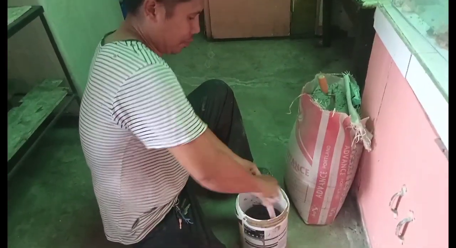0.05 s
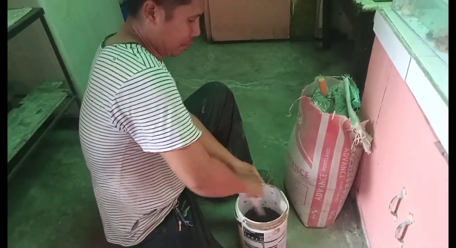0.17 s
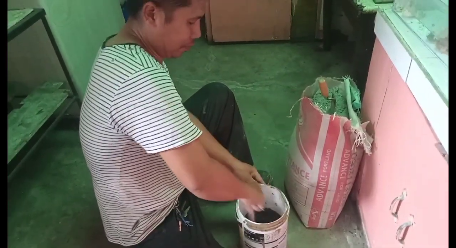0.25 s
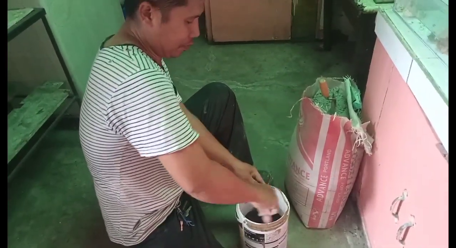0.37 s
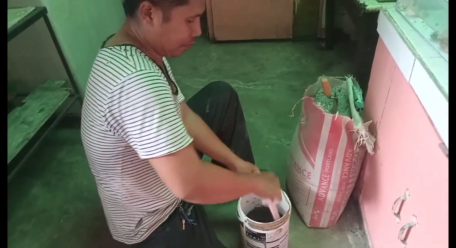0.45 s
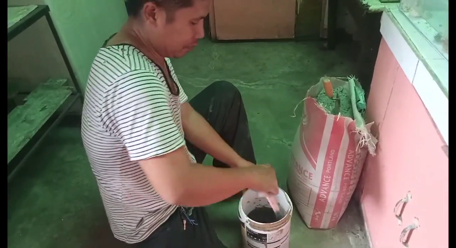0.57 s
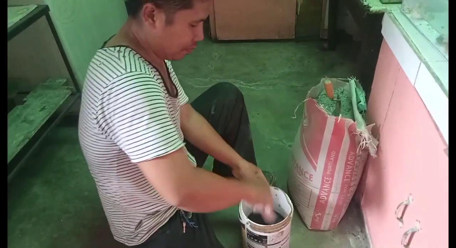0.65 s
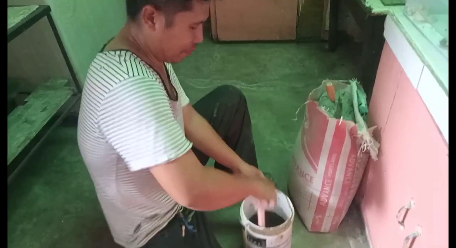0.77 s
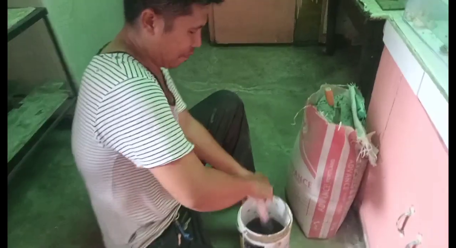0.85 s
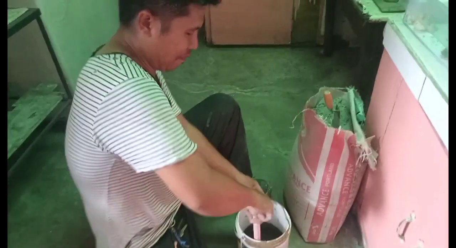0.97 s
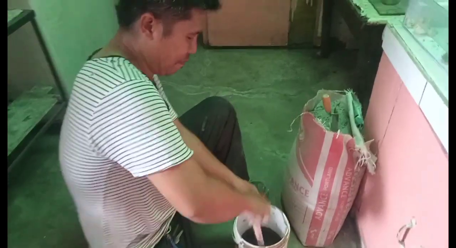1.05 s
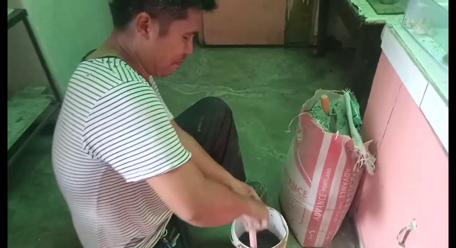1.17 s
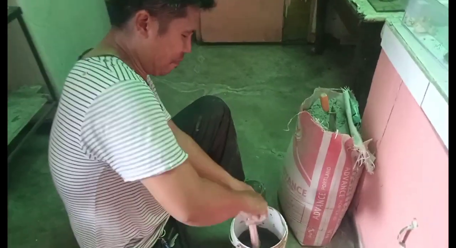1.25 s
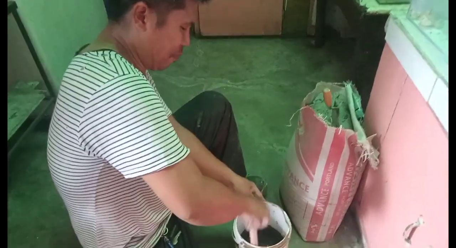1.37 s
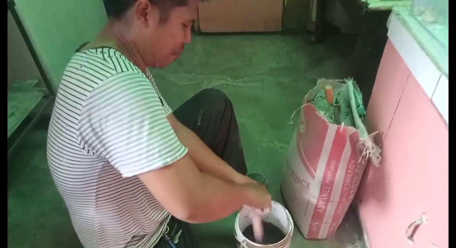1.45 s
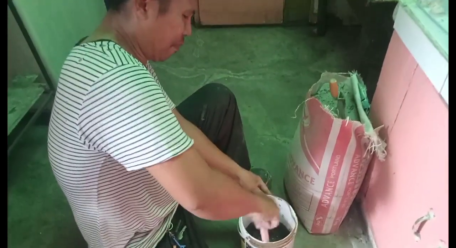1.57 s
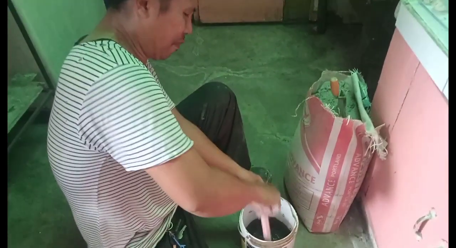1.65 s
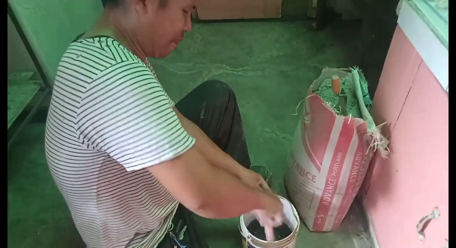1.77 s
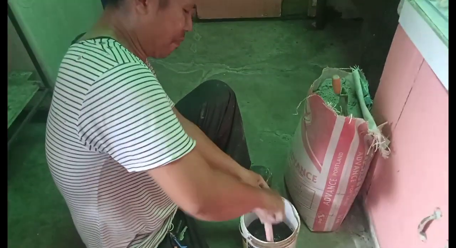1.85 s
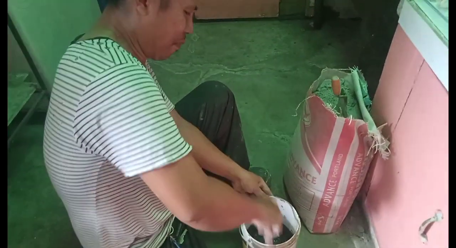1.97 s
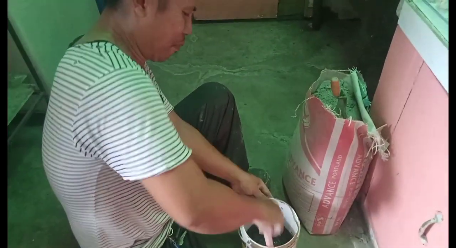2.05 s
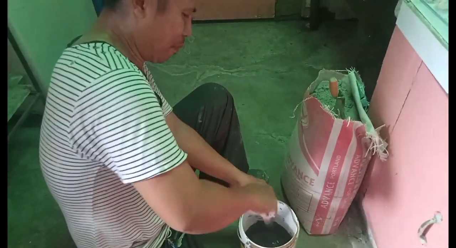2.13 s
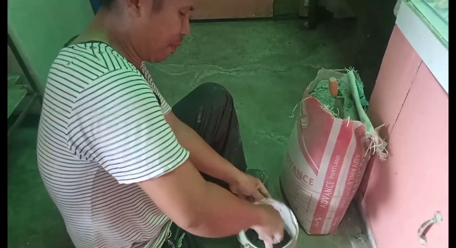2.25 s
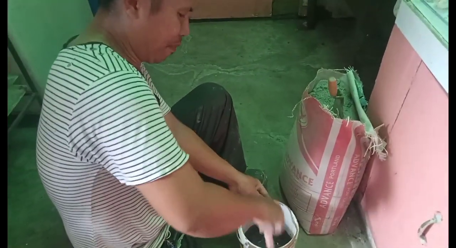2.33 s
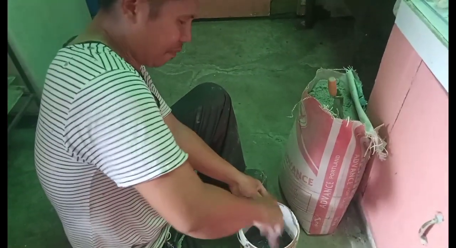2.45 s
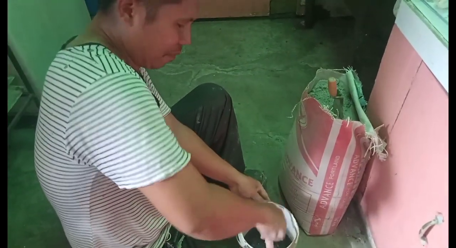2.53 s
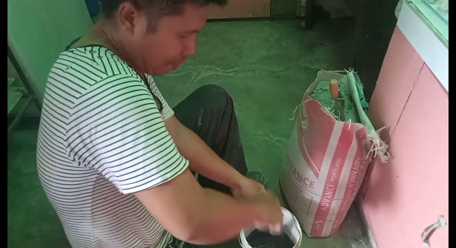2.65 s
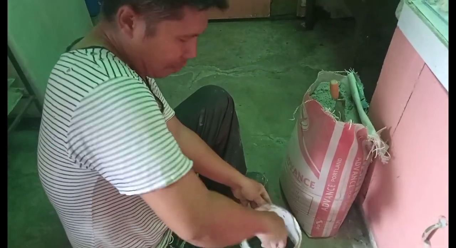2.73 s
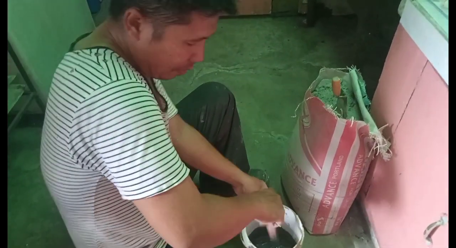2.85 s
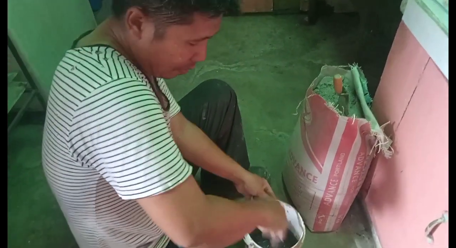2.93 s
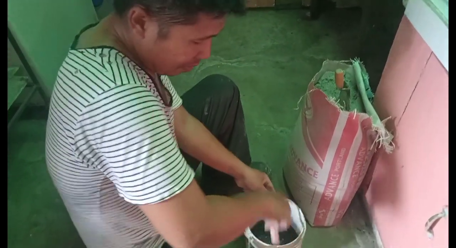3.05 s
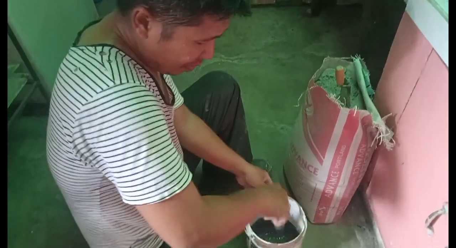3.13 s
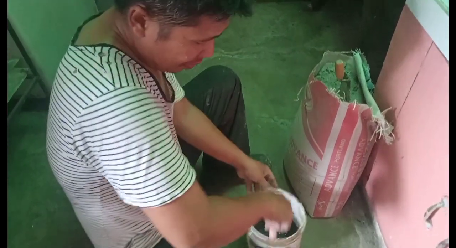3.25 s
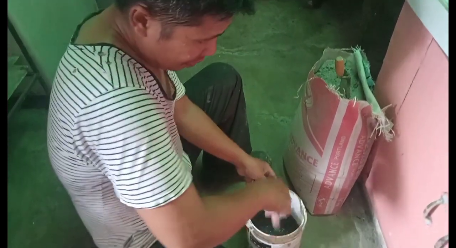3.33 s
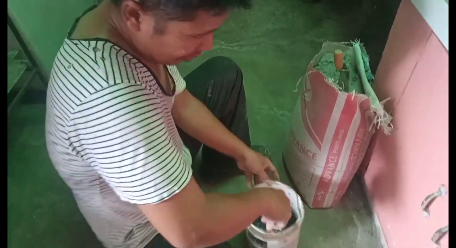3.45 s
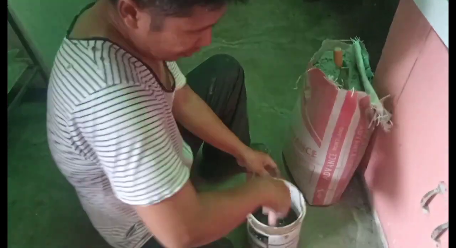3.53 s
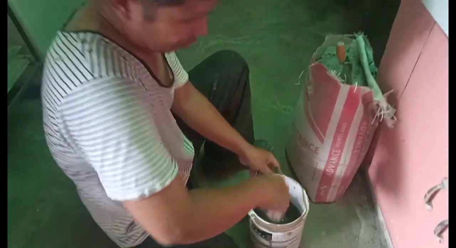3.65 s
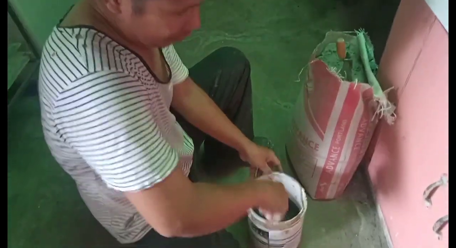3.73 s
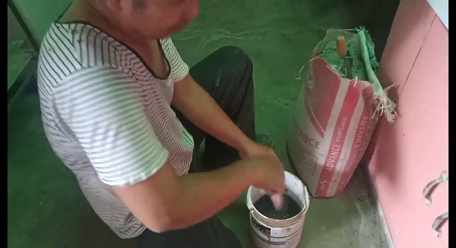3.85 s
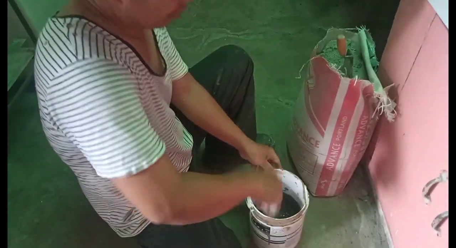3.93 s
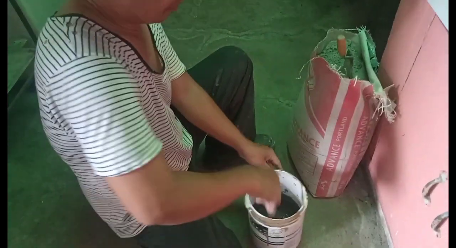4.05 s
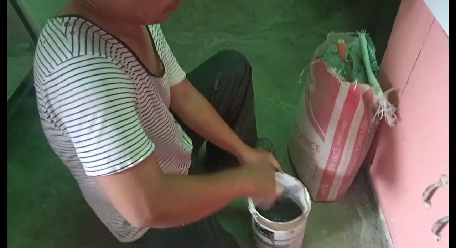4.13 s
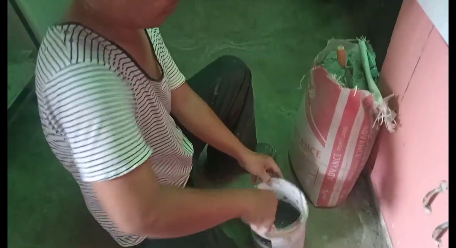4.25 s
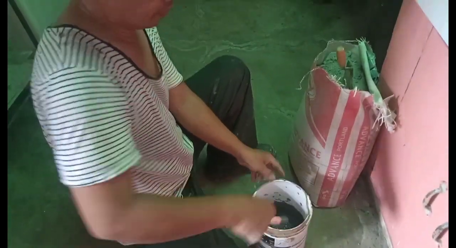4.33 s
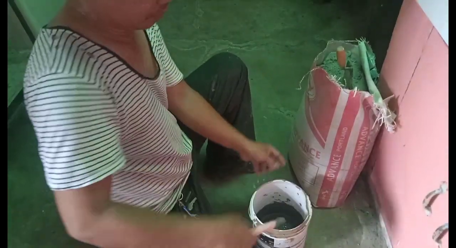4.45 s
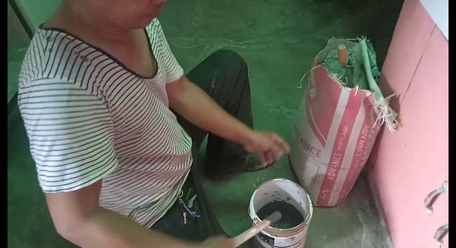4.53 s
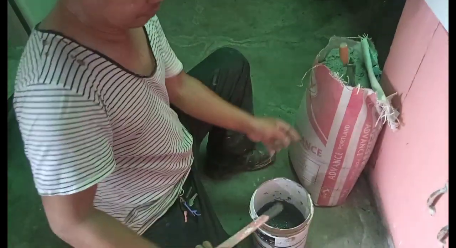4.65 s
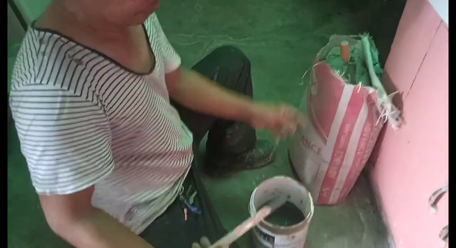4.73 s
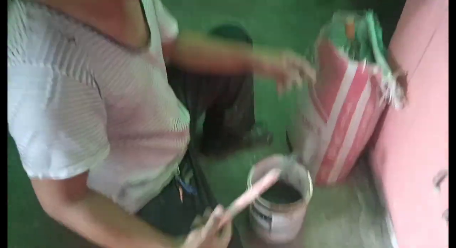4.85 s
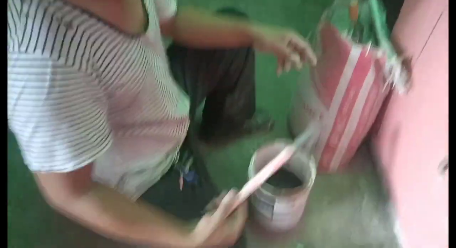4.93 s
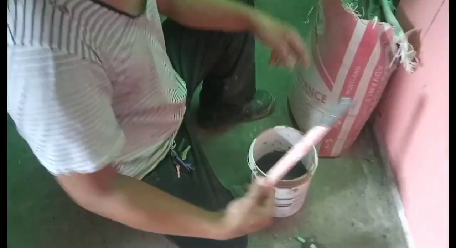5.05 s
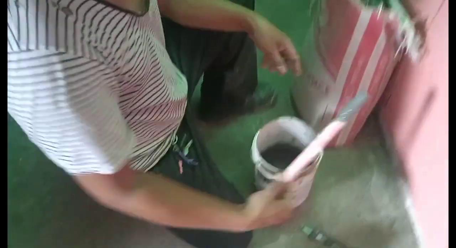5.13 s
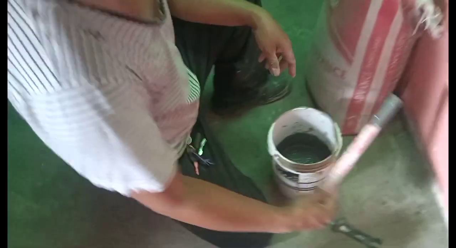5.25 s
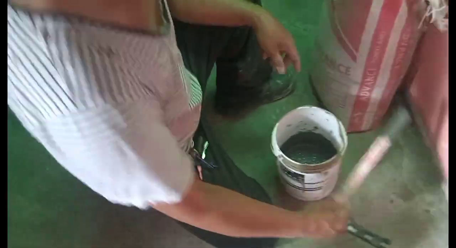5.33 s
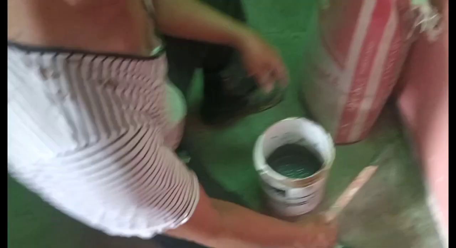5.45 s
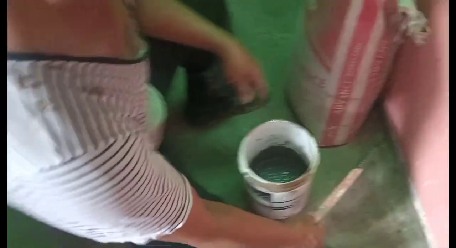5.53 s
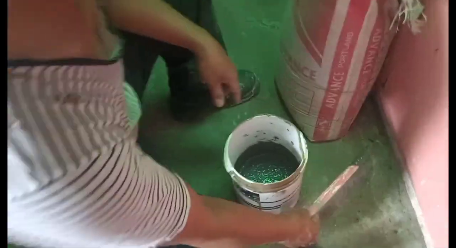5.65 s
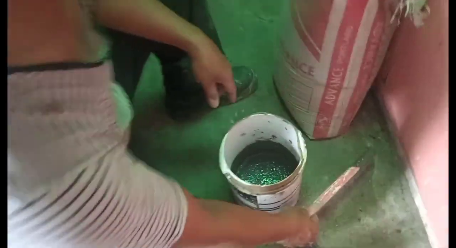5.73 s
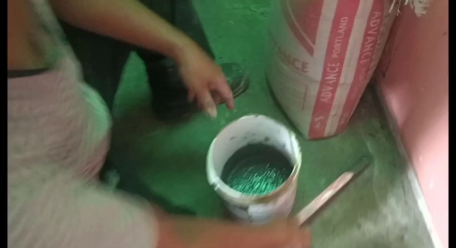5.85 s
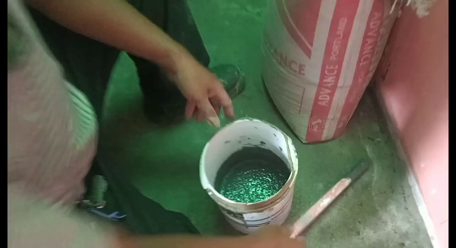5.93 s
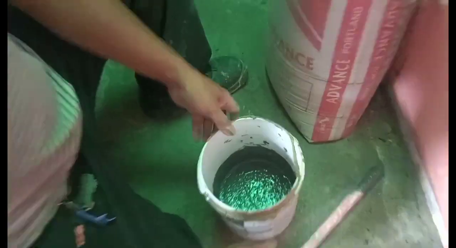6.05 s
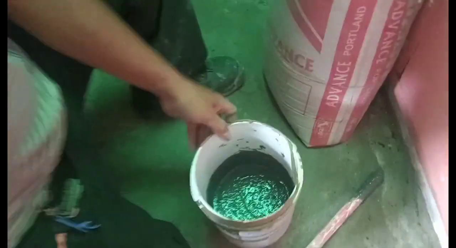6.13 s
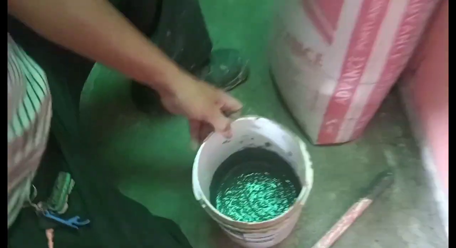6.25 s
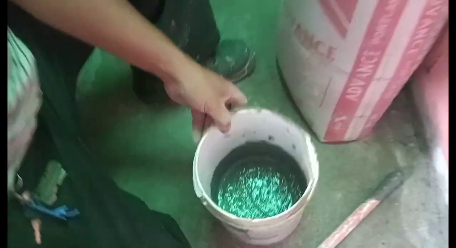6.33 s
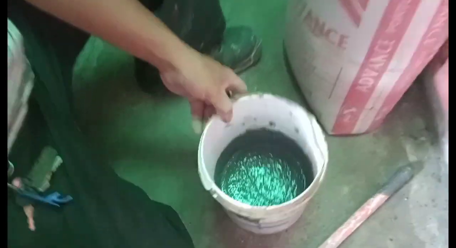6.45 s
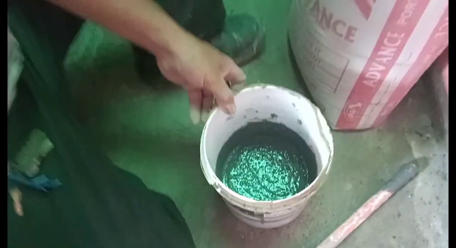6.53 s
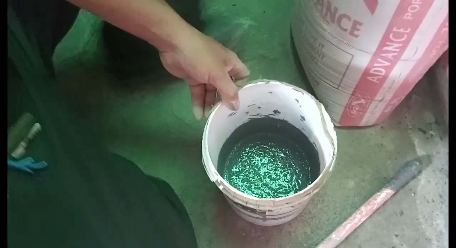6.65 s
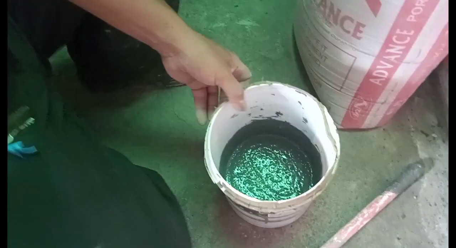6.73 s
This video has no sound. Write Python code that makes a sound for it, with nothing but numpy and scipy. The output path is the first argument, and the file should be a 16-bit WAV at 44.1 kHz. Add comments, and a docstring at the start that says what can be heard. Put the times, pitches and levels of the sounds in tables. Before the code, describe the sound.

In a small hard room, a stick stirs liquid in a small plastic bucket, knocking the wall about four times a second. Each knock is a clack with a hollow boom, over a very faint wash of liquid. The stirring stops, a dull thud follows, and a foot drags over grit. The stick drops sharply on concrete, keys clink close by and a hand bumps the bucket's rim. A far rumble and soft hiss lie underneath.

```python
"""In a small hard room, a stick stirs liquid in a small plastic bucket on a concrete floor.
Once a turn it knocks the wall: the plastic clacks, the hollow booms and the liquid washes round.
Then a foot drags over grit, the stick drops on the floor, keys clink and a hand takes hold of the rim.
Under it lie a far rumble, a soft hiss, at first a thin steady whistle, and later a faint high squeak."""
import sys
import numpy as np
from scipy import signal
from scipy.fft import rfft, irfft
from scipy.io import wavfile

SR = 44100
rng = np.random.default_rng(int(sys.argv[2]) if len(sys.argv) > 2 else 0)


def unload_wav(signal):
    """Save mono or channel-first audio to the path in sys.argv[1] as 16-bit WAV at rate SR, clipped to [-1, 1]."""
    wavfile.write(
        sys.argv[1],
        SR,
        np.round(np.clip(np.atleast_2d(signal).T, -1, 1) * 32767).astype(np.int16),
    )


N = 299439
T = np.arange(N) / SR
RING = T[:int(.7 * SR)]  # seconds since the start of one short sound


# The stick hits the wall, once a turn. Hardness 0 is a usual knock.
# (time [s], clack level [dB], boom compared with clack [dB], hardness [dB])
KNOCK_HITS = [(0.758, -10.5, -7.5, 0.5), (0.991, -10.5, 1.5, -5), (1.187, -11, -2.5, 0),
              (1.389, -9, -10.5, -0.5), (1.617, -8, 1, 0.5), (1.846, -14.5, 6, -6), (2.056, -9.5, -9.5, 1),
              (2.302, -8.5, -2, 0), (2.542, -6, -5.5, -3.5), (2.774, -6.5, -4, -2.5),
              (3.017, -8.5, -4, 0.5), (3.253, -8.5, -7, 0), (3.496, -7.5, -6, 0.5), (3.758, -11, -5, 1.5),
              (4.018, -8.5, -0.5, -0.5), (4.249, -8, -6.5, 0)]
# The notes of the plastic wall: (pitch [Hz], level [dB], fade time [s])
WALL_NOTES = [(793, -7, .36), (981, -5, .32), (1208, -7, .3), (1241, 0, .35), (1540, -7, .38),
              (1600, 0, .35), (1658, -4, .36), (1785, -5, .3), (1997, -3, .28), (2117, 0, .3),
              (2170, -5, .28), (2305, -2, .32), (2422, -5, .3), (2735, -8, .3), (3037, -11, .26),
              (3568, -11, .26)]
# The tone of the stick's first touch: (frequency [Hz], level [dB])
SNAP_TONE = [(500, -0.5), (2500, -7), (4000, -3), (5500, -6.5), (6500, -4), (7300, 1.5), (8500, -9),
             (10000, -17), (12000, -25.5), (15000, -17)]
# The tone of the wall giving way: (frequency [Hz], level [dB])
CLACK_TONE = [(40, -22), (160, -12), (300, 3), (470, 6), (680, -9.5), (1000, -8), (1240, -3.5), (1420, -6),
              (1620, -0.5), (2200, -0.5), (2900, -6), (3600, -8.5), (5000, -22), (16000, -43.5)]
def stick_knocks(give_s=.0018, spin_up_s=1.3, short_fade_s=.093):
    """Each knock snaps at first touch; then the wall gives, clacks and booms."""
    snap, body = np.zeros((2, N))
    for s, db, boom_db, hardness_db in KNOCK_HITS:
        snap_db = db - 11 + .45 * hardness_db
        add(snap, s - .0008, undb(snap_db + 5) * burst(fade_s=.009))
        add(snap, s - .0008, undb(snap_db - 5) * crack(fade_s=.068, echo_db=.5, tail_db=3.5))
        # a harder hit is shorter, so it sounds brighter
        brighten = lambda hz: 1.22 * hardness_db * np.clip(np.log2(hz / 1700), -.6, 1)
        tone = [(hz, level + brighten(hz)) for hz, level in CLACK_TONE]
        notes = [(hz, level + brighten(hz), fade_s) for hz, level, fade_s in WALL_NOTES]
        wall_ring = ring(notes, scatter_db=3, detune=.005)
        # short, broad resonances colour the clack
        short_notes = [(hz, level, short_fade_s) for hz, level, _ in notes]
        short_ring = ring(short_notes, scatter_db=4, detune=.017)
        clack = colour(crack(fade_s=.031, echo_db=-3, tail_db=1), tone)
        add(body, s + give_s - .001, undb(db) * clack)
        add(body, s + give_s, undb(db - 21.5) * short_ring + undb(db - 20) * wall_ring)
        # the upper boom follows the lower, and is weak until the liquid is spinning
        stillness = max(1 - (s - KNOCK_HITS[0][0]) / spin_up_s, 0)
        upper_db = db - 4 + .7 * boom_db - 14.5 * stillness
        add(body, s, hollow_boom(db + boom_db, upper_db))
    return colour(snap, SNAP_TONE) + body


# Low notes of the bucket's hollow and the room: (pitch [Hz], level [dB], fade time [s])
LOW_BOOM_NOTES = [(155, -10, .21), (178, -19, .35), (250, -17, .38), (275, -2, .15), (319.5, 0, .35),
                  (330.5, -2, .36), (344, 7, .15), (352, -1, .28), (418, -6, .28)]
# The boom's higher notes: (pitch [Hz], level [dB], fade time [s])
UPPER_BOOM_NOTES = [(492, 5, 0.11), (507, 1, 0.25), (555, -2.5, 0.26), (619.3, -9, 0.32)]
def hollow_boom(low_db, upper_db):
    """The bucket's boom swells quickly; notes close in pitch throb together as it dies."""
    low = ring(LOW_BOOM_NOTES, scatter_db=.6, detune=.0007) * rise(.011)
    upper = ring(UPPER_BOOM_NOTES, scatter_db=3.5, detune=.0074) * rise(.0015)
    return undb(low_db - 2) * low + undb(upper_db - 6.5) * upper


# Soft bumps on the bucket: (time [s], level [dB], extra level for the upper boom [dB])
BUMP_HITS = [(0.846, -20, -2.5), (4.377, -19, -0.5), (4.844, -42.5, -5), (6.475, -31, -4),
             (6.54, -31.5, -28), (6.747, -25, -27)]
# The tone of a padded touch: (frequency [Hz], level [dB])
BUMP_TONE = [(50, -12), (130, -4), (250, 1.5), (400, -2.5), (600, -9.5), (1200, -12), (2500, -14),
             (6000, -38), (16000, -67)]
def bucket_bumps():
    """A soft shove gives a brief dull knock and wakes the boom."""
    contact, boom = np.zeros((2, N))
    for s, db, upper_db in BUMP_HITS:
        add(contact, s, undb(db - 2.5) * crack(fade_s=.048, echo_db=-3, tail_db=.5))
        add(boom, s, hollow_boom(db + .5, db + upper_db))
    return colour(contact, BUMP_TONE) + boom


# The stick lands and bounces: (time [s], level [dB])
STICK_LANDINGS = [(5.9421, 3), (5.9555, -1.5)]
# The tone of wood on concrete: (frequency [Hz], level [dB])
STICK_TONE = [(200, -18), (700, -8.5), (1300, -3), (1800, 6), (2300, 3.5), (3200, -4.5), (4400, 1.5),
              (6200, -12), (7400, -4), (9500, -23), (15000, -26)]
def dropped_stick():
    """Wood cracks on concrete, one end after the other, and rings briefly."""
    out = np.zeros(N)
    for s, db in STICK_LANDINGS:
        contact = crack(fade_s=.014, echo_db=-20, tail_db=-5)
        wood_ring = undb(-14.5) * burst(fade_s=.12)
        add(out, s, undb(db - 7) * (contact + wood_ring))
    return colour(out, STICK_TONE)


# Dull thuds of handling: (time [s], level [dB], pitch [Hz], fade time [s])
THUD_HITS = [(4.977, 0.5, 395, 0.0091), (6.728, -16, 258, 0.069), (6.746, -6.5, 252, 0.037)]
def handling_thuds():
    """Each nearby bump is one low note that dies at once, with a tiny click."""
    out = np.zeros(N)
    for s, db, hz, fade_s in THUD_HITS:
        thud = np.sin(2 * np.pi * hz * RING) * fade(fade_s) * rise(.0012)
        click = undb(-23.5) * colour(burst(fade_s=.028), CLACK_TONE)
        add(out, s, undb(db) * (thud + click))
    return out


# The keys shake: (time [s], level [dB], length [s])
KEY_CLINKS = [(6.085, -26.5, 0.0087), (6.115, -24.5, 0.013), (6.155, -19, 0.0091), (6.194, -23, 0.0045),
              (6.258, -36, 0.0038)]
# The tone of the keys' metal: (frequency [Hz], level [dB])
KEY_TONE = [(1000, -10.5), (2700, -4), (3700, 4.5), (5500, -3), (7400, 5), (10000, -8), (13500, -4),
            (16000, -4.5)]
def keys(attack_s=.0023, release_s=.0069):
    """Each clink is a quick flurry of tiny metal hits, close by."""
    shake = np.zeros(N)
    for s, db, length in KEY_CLINKS:
        start = np.minimum(RING / attack_s, 1)
        finish = np.exp(-np.maximum(RING - length, 0) / release_s)
        add(shake, s, undb(db) * start * finish)
    return colour(shake * grains(per_second=2500, spread_db=4), KEY_TONE)


# Light touches of stick and fingers: (time [s], level [dB])
LIGHT_TOUCHES = [(4.2991, -25), (4.5276, -39.5), (4.845, -49.5), (6.5084, -39), (6.6238, -38.5),
                 (6.73, -38)]
def plastic_ticks(graze_chance=.6, lead_s=.05, jitter_s=.009):
    """The plastic ticks when touched lightly, or when the stick grazes it just before a knock."""
    wobbles = rng.standard_normal((len(KNOCK_HITS) - 1, 2))
    grazes = []
    for (s, *_), (timing, strength) in zip(KNOCK_HITS[1:], wobbles):
        if rng.random() < graze_chance:
            grazes.append((s - lead_s + jitter_s * timing, -37.5 + 3 * strength))
    out = np.zeros(N)
    tick = crack(fade_s=.03, echo_db=-4.5, tail_db=-2.5)
    for s, db in grazes + LIGHT_TOUCHES:
        add(out, s, undb(db) * tick)
    return colour(out, SNAP_TONE)


# A foot and other things drag: (time [s], length [s], level [dB], pitch [Hz], sharpness of pitch [Q])
DRAGS = [(0.086, 0.068, -54, 7340, 6), (0.524, 0.048, -46.5, 2380, 1.8), (0.62, 0.15, -43, 1500, 10),
         (5.128, 0.083, -40.5, 2380, 8.4), (5.335, 0.22, -29.5, 1940, 1.84),
         (6.492, 0.034, -36.5, 2330, 7.2), (6.615, 0.045, -32, 3120, 4.8), (6.723, 0.08, -28, 3560, 3.8)]
# The tone of rubbing, for both grit and liquid: (frequency [Hz], level [dB])
RUB_TONE = [(150, -15.5), (700, -6), (1100, -5.5), (1500, 0.5), (2200, -2), (3800, -3), (5000, -14.5),
            (7500, -11.5), (9500, -25), (15000, -26)]
def scrapes(edge_s=.019, ease_db_per_s=21.5):
    """Grit catches and slips under whatever is dragged, ringing at one pitch as the pressure eases."""
    out = np.zeros(N)
    grit = undb(-5) * colour(grains(per_second=1200, spread_db=3.5), RUB_TONE)
    for s, length, db, hz, sharpness in DRAGS:
        rub = grit[int(s * SR):][:len(RING)]
        ringing = undb(6) * signal.lfilter(*signal.iirpeak(hz, sharpness, SR), rub)
        on_off = np.clip(np.minimum(RING, length + edge_s - RING) / edge_s, 0, 1)
        pressure = on_off * undb(db - ease_db_per_s * RING)
        add(out, s, pressure[:len(rub)] * (rub + ringing))
    return out


def liquid_swirl(rise_s=.048, settle_s=.13):
    """Each stroke pushes the liquid, which washes softly round the stick and settles."""
    flow = np.zeros(N)
    for s, *_ in KNOCK_HITS:
        add(flow, s, (1 - np.exp(-T / rise_s)) * np.exp(-T / settle_s))
    wash = colour(grains(per_second=50, spread_db=3), RUB_TONE)
    return undb(-48.5) * flow * wash


# The path of the squeak: (time [s], pitch [Hz])
SQUEAK_PITCH = [(4.82, 12800), (4.87, 13800), (5.0, 13500), (5.06, 12100), (5.14, 11950)]
def squeak():
    """A faint, very high tone swells, lifts a little and sinks."""
    s, hz = np.transpose(SQUEAK_PITCH)
    progress = np.clip((T - s[0]) / (s[-1] - s[0]), 0, 1)
    swell = np.sqrt(np.abs(np.sin(np.pi * progress)))
    return undb(-79) * swell * sine(np.interp(T, s, hz))


def whistle(pitch_hz=3123, waver_hz=50, end_s=.87, release_s=.37):
    """A thin whistle trembles around one pitch and dies away early."""
    waver = np.interp(T, RING * 10, rng.standard_normal(len(RING)))
    fade_out = np.clip((end_s - T) / release_s, 0, 1)
    return undb(-54) * fade_out * np.sqrt(2) * sine(pitch_hz + waver_hz * waver)


# The tone of the far rumble: (frequency [Hz], level [dB])
RUMBLE_TONE = [(20, -41), (45, -23), (85, 1), (120, -6.5), (148, 0), (200, -10.5), (350, -19), (600, -31.5),
               (2000, -56.5)]
# How loud the rumble is as time passes: (time [s], level [dB])
RUMBLE_LOUDNESS = [(0, -45), (.6, -50), (2.5, -50), (4.6, -43.5), (6.2, -38), (6.79, -43.5)]
# The tone of the soft hiss: (frequency [Hz], level [dB])
HISS_TONE = [(150, -18), (300, 3.5), (600, -6), (1100, -4), (2700, -4.5), (3700, -12.5), (5000, -25.5),
             (7500, -23), (9500, -52), (16000, -48)]
def rumble_and_hiss():
    """A far rumble slowly sinks and swells under a soft hiss; both flicker slightly."""
    loudness = undb(np.interp(T, *np.transpose(RUMBLE_LOUDNESS)))
    rumble = colour(grains(per_second=9, spread_db=1), RUMBLE_TONE)
    hiss = colour(grains(per_second=12, spread_db=.7), HISS_TONE)
    return loudness * rumble + undb(-49.5) * hiss


# How long sound lingers in the room: (frequency [Hz], fade time [s])
ROOM_FADE = [(100, 0.62), (300, 0.45), (800, 0.51), (2000, 0.44), (5000, 0.35), (8000, 0.33), (14000, 0.25)]
def room_tail():
    """Many echoes blur into a tail that dulls as it dies; drawn afresh each time."""
    hz, s, bands = signal.stft(rng.standard_normal(len(RING)), SR, nperseg=256)
    bands = bands * np.exp(-np.log(1000) * s / look_up(ROOM_FADE, hz)[:, None])
    tail = signal.istft(bands, SR)[1][:len(RING)] * rise(.00093)
    return tail / np.linalg.norm(tail)


def in_room(x, tail_db=-6.5):
    """A lasting sound with the room's tail behind it."""
    return x + undb(tail_db) * signal.fftconvolve(x, room_tail())[:N]


def crack(fade_s, echo_db, tail_db, echo_s=.0093):
    """A hard hit in the room: a burst, its echo off the near wall and the room's tail."""
    direct = burst(fade_s)
    echo = np.pad(burst(fade_s), (int(echo_s * SR), 0))[:len(RING)]
    tail = np.linalg.norm(direct) * room_tail()
    return direct + undb(echo_db) * echo + undb(tail_db) * tail


def ring(notes, scatter_db, detune):
    """A struck thing rings; each blow lands elsewhere, so its notes come out a little differently."""
    out = np.zeros(len(RING))
    for hz, db, fade_s in notes:
        louder, higher = rng.standard_normal(2)
        wave = np.sin(2 * np.pi * hz * (1 + detune * higher) * RING)
        out += undb(db + scatter_db * louder) * fade(fade_s) * wave
    return out


def burst(fade_s):
    """A dying puff of noise, like many close notes at once."""
    return rng.standard_normal(len(RING)) * fade(fade_s)


def grains(per_second, spread_db):
    """Noise whose level jumps about, scaled to an average power of 1."""
    jumps = np.arange(0, T[-1] + 1, 1 / per_second)
    noise = rng.standard_normal(N)
    noise *= undb(spread_db * np.interp(T, jumps, rng.standard_normal(len(jumps))))
    return noise / np.sqrt(np.mean(noise ** 2))


def colour(x, tone, size=4096):
    """Filter x to a tone table, which sets the balance of low and high but not the overall level."""
    hz = np.arange(size // 2 + 1) * SR / size
    cepstrum = irfft(np.log(undb(look_up(tone, hz))))
    # fold the second half onto the first, so the filter rings only after a hit
    cepstrum[1:size // 2] *= 2
    cepstrum[size // 2 + 1:] = 0
    response = irfft(np.exp(rfft(cepstrum)))
    return signal.fftconvolve(x, response / np.linalg.norm(response))[:len(x)]


def look_up(table, hz):
    """Read between the rows of a (frequency, value) table, with octaves evenly spaced."""
    frequencies, values = np.transpose(table)
    return np.interp(np.log(hz + 1), np.log(frequencies), values)


def sine(hz):
    """A pure tone that follows a changing pitch."""
    return np.sin(2 * np.pi * np.cumsum(hz) / SR)


def rise(rise_s):
    """Climb smoothly from 0 towards 1."""
    return 1 - np.exp(-RING / rise_s)


def fade(fade_s):
    """Die away; a fade time is how long a sound takes to fall by 60 dB."""
    return np.exp(-np.log(1000) * RING / fade_s)


def undb(db):
    """Turn decibels into a multiplier."""
    return 10 ** (np.asarray(db) / 20)


def add(out, s, x):
    """Mix x into out from time s."""
    i = int(s * SR)
    out[i:i + len(x)] += x[:N - i]


def scene():
    """Mix one channel: the hits bring their own echoes, while rubbing and keys get the room's here."""
    rubbing = in_room(liquid_swirl() + scrapes())
    jingling = in_room(keys())
    hits = stick_knocks() + bucket_bumps() + plastic_ticks() + dropped_stick()
    thuds = handling_thuds()
    background = squeak() + rumble_and_hiss() + whistle()
    return (hits + rubbing + jingling + thuds + background)[None]


def record(dry, bass_hz=70, top_hz=15800):
    """The phone thins the deep bass, rounds the loudest peaks and cuts the highest treble."""
    thinned = signal.sosfilt(signal.butter(2, bass_hz, "high", fs=SR, output="sos"), dry)
    rounded = np.tanh(thinned)
    return signal.sosfilt(signal.ellip(8, .2, 70, top_hz, fs=SR, output="sos"), rounded)


dry = scene()
out = record(dry)
unload_wav(out)
```